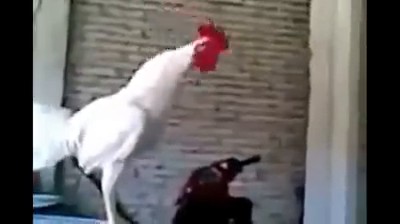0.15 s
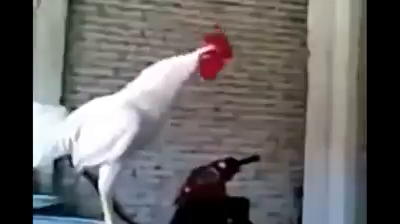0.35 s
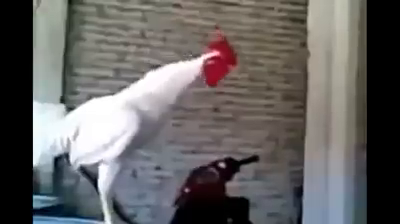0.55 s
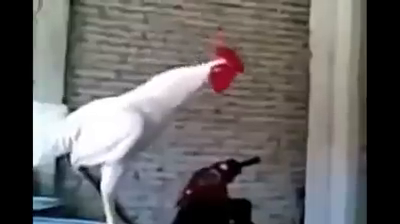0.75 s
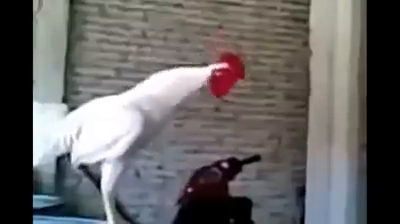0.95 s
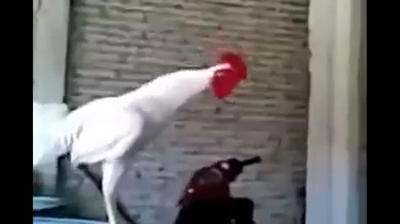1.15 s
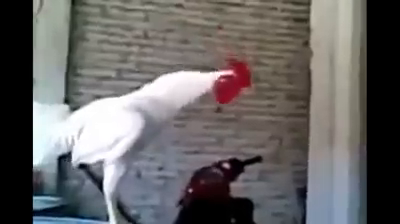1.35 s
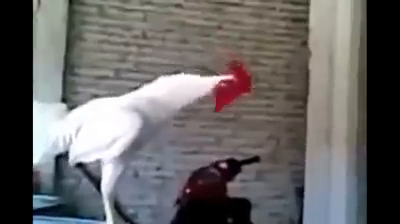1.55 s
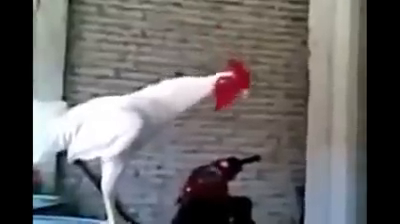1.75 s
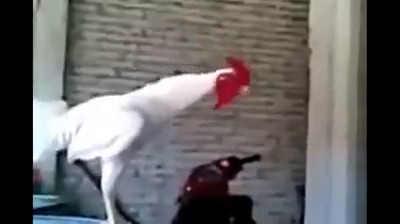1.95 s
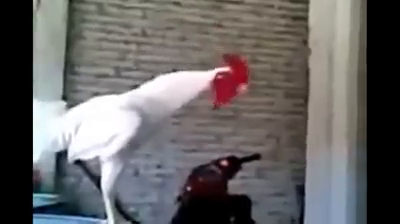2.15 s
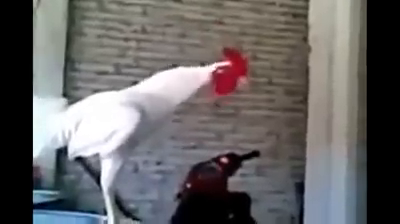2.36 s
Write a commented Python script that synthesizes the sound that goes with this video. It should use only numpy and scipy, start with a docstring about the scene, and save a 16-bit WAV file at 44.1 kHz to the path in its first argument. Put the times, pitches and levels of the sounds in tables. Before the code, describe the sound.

Rooster crowing without pause: a raspy held note, then a dozen pulsing yelps, distorted and close

```python
"""A steady outdoor wash and a low hum, wavering in pitch and level, lie behind a rooster crowing close to a wall.
It opens with one hoarse held note: harmonics, the second carrying the voice, mixed with resonant noise.
Then comes a chain of short syllables, most gliding up and sinking a little, the fundamental joining at a break.
After each, sparse decaying reflections of wall and yard ring on, with faint fuzzy tones fed by the voice.
Throughout, the small recorder overloads, which adds the treble, and leaves a brief afterglow."""
import sys
import numpy as np
from scipy import signal
from scipy.fft import rfft, irfft
from scipy.io import wavfile
from scipy.ndimage import uniform_filter1d

SR = 44100
rng = np.random.default_rng(int(sys.argv[2]) if len(sys.argv) > 2 else 0)


def dump_mix(stems):
    """Bounce the given channels to the path in sys.argv[1] as a 16-bit WAV at rate SR."""
    frames = np.atleast_2d(stems).T  # one column per channel
    limited = np.clip(frames, -1, 1)  # hard clip at full scale
    pcm = np.round(limited * 32767).astype(np.int16)
    wavfile.write(sys.argv[1], SR, pcm)


def ratio_of_db(decibels):
    """Turn decibels (scalar or array-like) into linear amplitude factors; 0 dB maps to 1."""
    return 10 ** (np.asarray(decibels, float) / 20)


N = 110250  # samples, 2.5 s


def evened(x):
    """Normalization: scales to rms 1."""
    return x / np.sqrt(np.mean(x ** 2) + 1e-20)


def wander(span):
    """Low-pass noise: white noise averaged twice over span samples, at rms 1."""
    return evened(uniform_filter1d(uniform_filter1d(rng.standard_normal(N), span), span))


def read(points, hz):
    """Interpolation of a spectrum or decay curve on a logarithmic frequency axis."""
    f, value = np.transpose(points)
    return np.interp(np.log(hz + 1), np.log(f + 1), value)


def resonate(x, hz, width):
    """Resonance by heterodyning: shift hz to zero, low-pass, shift back; gain 1 at the centre."""
    turn = np.exp(2j * np.pi * np.cumsum(hz * np.ones(len(x))) / SR)
    r = np.exp(-np.pi * width / SR)
    return 2 * (turn * signal.lfilter([1 - r], [1, -r], x / turn)).real


def resonate_twice(x, hz, width):
    """Cascaded resonance: two equal passes give steeper skirts."""
    return resonate(resonate(x, hz, width), hz, width)


def resonator_bank(x, bands):
    """Parallel resonances: the weighted sum of all bands."""
    return sum(ratio_of_db(db) * resonate_twice(x, hz, width) for hz, width, db in bands)


DROOP_HZ = 944  # corner of the recorder's coupling high-pass


def lifted(x):
    """Inverse filtering: undoes the coupling droop down to 20 Hz, so levels hold after the high-pass."""
    r = np.exp(-2 * np.pi * DROOP_HZ / SR)
    return signal.lfilter([1, -r], [1, -np.exp(-2 * np.pi * 20 / SR)], x)


# spectrum of the outdoor wash: f/Hz, relative density level/dB per Hz
WASH_SPECTRUM = [(30,6.5),(100,1.5),(400,-1),(800,8.5),(1500,1.5),(1900,-13.5),(2200,-53),(2600,-7.5),(3200,-20),(10000,-39.5)]
WASH_DB = -51.5  # rms, before lifting


def outdoor_wash():
    """Spectral shaping: steady Gaussian noise weighted by frequency."""
    spectrum = rfft(rng.standard_normal(N)) * ratio_of_db(read(WASH_SPECTRUM, np.fft.rfftfreq(N, 1 / SR)))
    return ratio_of_db(WASH_DB) * evened(irfft(spectrum, N))


# rms of the hum, before lifting, as it comes and goes: t/s, level/dB
HUM_LEVEL = [(0.0, -39), (0.05, -90), (0.311, -44.5), (0.37, -62.5), (0.649, -51), (0.88, -100),
             (0.99, -44), (1.02, -77), (1.2, -63), (1.26, -44.5), (1.3, -66), (1.36, -45.5), (1.531, -50.5),
             (1.61, -58.5), (2.38, -58.5), (2.42, -42), (2.5, -47.5)]
HUM_HZ, HUM_DRIFT_HZ = 148.4, 2.96  # mean frequency and its rms drift


def hum():
    """Frequency and amplitude modulation: a sine drifts in pitch under a level contour."""
    s, db = np.transpose(HUM_LEVEL)
    hz = HUM_HZ + HUM_DRIFT_HZ * wander(1500)
    level = ratio_of_db(np.interp(np.arange(N) / SR, s, db))
    return level * np.sqrt(2) * np.sin(2 * np.pi * np.cumsum(hz) / SR)


# reverberation time of wall and yard by band: f/Hz, t60/s
YARD_DECAY = [(500, 0.33), (800, 0.37), (1600, 0.2), (2600, 0.3), (6000, 0.27)]
ECHO_SPREAD_DB = 5  # mean of the exponential spread in dB: a few reflections stand out


def yard(x):
    """Reverberation: sparse echoes of random sign and size, each band decaying exponentially."""
    taps = np.zeros((1, SR // 2))
    at = np.arange(260, SR // 2 - 130, 130)
    at = at + rng.integers(0, 130, (1, len(at)))  # one echo in every 3 ms
    size = ratio_of_db(ECHO_SPREAD_DB * rng.exponential(1, at.shape))
    np.put_along_axis(taps, at, rng.choice([-1., 1.], at.shape) * size, 1)
    hz, t, bands = signal.stft(taps, SR, nperseg=256)
    decay = ratio_of_db(-60 * t / read(YARD_DECAY, hz)[:, None])
    tail = signal.istft(bands * decay, SR, nperseg=256)[1]
    return signal.fftconvolve(x[None], tail / np.linalg.norm(tail[0]), axes=1)[:, :N]


# faint fuzzy tones: f/Hz, width of one pass/Hz, level/dB relative to the voice's running rms, before lifting
FUZZY_TONES = [(570, 24, -34.5), (2551, 138, -35)]
LINGER_S, LAG_S = 0.14, 0.041  # t60 of the tones, delay after the voice


def lingering(bird):
    """Energy storage: narrow noise follows the delayed, exponentially smoothed power of the voice."""
    r = ratio_of_db(-120 / LINGER_S / SR)  # decay of power per sample
    noise = rng.standard_normal(N)
    tones = sum(ratio_of_db(db) * evened(resonate_twice(noise, f, w)) for f, w, db in FUZZY_TONES)
    fed = np.roll(bird, round(LAG_S * SR)) ** 2
    power = signal.lfilter([1 - r], [1, -r], fed, zi=[r * np.mean(bird ** 2)])[0]
    return tones * np.sqrt(power)


# colour of the hoarse air: f/Hz, width of one pass/Hz, relative level/dB
AIR_BANDS = [(736, 124, 3), (1181, 358, 12.5), (1484, 367, 13), (1682.5, 84, 8.5), (2533, 260, -0.5)]


def hoarse_air(turns):
    """Turbulence: noise pulsed at the pitch (phase turns) excites resonances; rms 1."""
    noise = rng.standard_normal(N) * (1 + .5 * np.cos(turns))
    return evened(resonator_bank(noise, AIR_BANDS))


SHIMMER_DB, SHIMMER_S = 17.5, 0.0041  # depth at full roughness, averaging span


def shimmer(rough):
    """Random amplitude modulation: brief dips as the voice breaks up, deeper where it is hoarse."""
    return ratio_of_db(SHIMMER_DB * rough * np.minimum(0, wander(round(SHIMMER_S * SR))))


JOIN_S = 0.0041  # rise of the fundamental up to the break
KNOCK_HZ, KNOCK_WIDTH_HZ = 323, 200
KNOCK_DB, KNOCK_S = -38.5, 0.013  # level beside the throat resonances, before VOICE_DB; delay


def knock(since):
    """Gated resonance: a short Gaussian burst of low narrow noise just after each voice break."""
    gate = np.exp(-((since - KNOCK_S) / (2 * JOIN_S)) ** 2)
    thud = gate * resonate(rng.standard_normal(N), KNOCK_HZ, KNOCK_WIDTH_HZ)
    return ratio_of_db(KNOCK_DB) * np.sqrt(SR / KNOCK_WIDTH_HZ) * thud


# one contour per short syllable: t/s, pitch f/Hz, second-harmonic level/dB
SYLLABLES = [
    [(.49,524.8,-9.5),(.505,537.8,-15),(.52,678.5,-9),(.55,707.4,-16),(.57,854.6,-3),(.585,803.4,-20),(.6,750,-1)],
    [(.655,546.2,-19),(.68,658.4,-15),(.7,718.5,-10),(.72,850.4,-13),(.755,848,-15),(.775,748,-21.5)],
    [(.825,524.3,-23.5),(.845,567,-17),(.865,647.4,-17),(.885,728.7,-18.5),(.9,831.4,-8),(.935,811.7,-16),(.955,749,-17)],
    [(1.005,539.7,-23),(1.035,620,-16.5),(1.05,683,-29),(1.062,806.5,-13.5),(1.1,833.7,-14),(1.115,800.2,-25.5),(1.14,740,-15.5)],
    [(1.192,545.3,-16),(1.225,603.2,-10.5),(1.24,685.3,-13),(1.255,803.6,-6.5),(1.275,803.4,-14),(1.29,741.5,-30)],
    [(1.36,541.4,-21.5),(1.372,552,-18.5),(1.395,577.3,-31),(1.412,797.8,-13.5),(1.44,793.3,-5.5),(1.455,759.4,-22.5),(1.49,735,-34)],
    [(1.53,526.8,-31),(1.56,565,-17),(1.575,608.2,-23),(1.585,685.2,-20.5),(1.592,789.7,-6),(1.62,767.9,-18),(1.655,739.6,-17)],
    [(1.71,530.7,-32),(1.74,552,-12),(1.757,700.5,-19.5),(1.775,771.7,-15.5),(1.8,765.2,-13),(1.815,726.4,-67.5)],
    [(1.885,542.7,-26.5),(1.92,543.2,-21.5),(1.93,650,-12),(1.958,692.2,-10),(1.982,670,-17.5),(2.0,656,-23.5)],
    [(2.07,513,-22),(2.09,521.8,-39),(2.103,541,-15.5),(2.115,640.5,-11),(2.15,622.3,-8),(2.165,590.5,-31),(2.175,578,-18)],
    [(2.255,515.2,-29.5),(2.292,532,-17),(2.305,646.4,-9),(2.33,618.5,-15),(2.355,628.5,-20.5),(2.38,617.6,-27.5),(2.39,610.5,-43)],
    [(2.452,508.3,-27),(2.48,510.3,-24),(2.492,537,-20),(2.5,570,-12)],
]
# the held opening note: t/s, pitch f/Hz, second-harmonic level/dB, fundamental level/dB
HELD_NOTE = [(0.0, 695.7, -3, -59), (0.042, 690.2, -21.5, -41), (0.054, 661.0, -15, -32),
             (0.134, 752.3, -6, -10), (0.144, 716.7, -4.5, -9), (0.168, 740.3, -6, -8),
             (0.208, 746.4, -9.5, -30.5), (0.226, 709.4, -12, 1.5), (0.29, 754.4, -8, -16.5),
             (0.302, 821.2, -15, -12.5), (0.352, 908.4, -10.5, -23), (0.365, 881.9, -10.5, -2.5),
             (0.43, 890, -14, -13.5), (0.47, 895.8, -32, -54)]
# voice quality: t/s, share of air (0-1), rms pitch jitter (ratio),
# fundamental level/dB of the syllables relative to the second harmonic
ROUGHNESS = [(0,1,0.03548,-15),(0.101,0.59,0.02835,-14),(0.279,0.69,0.0353,0),(0.448,0.84,0.0428,7.5),(.9,0.58,0.0451,5),(1.301,0.33,0.0236,3),(1.802,0.32,0.0289,2),(2.049,0.34,0.028,-0.5),(2.5,0.33,0.035,-1)]
# voice break of each syllable, the last one beyond the end: t/s
BREAKS = [0.506, 0.692, 0.866, 1.046, 1.226, 1.398, 1.577, 1.752, 1.957, 2.151, 2.34, 2.512]
# fixed resonances of throat and place: f/Hz, width of one pass/Hz, level/dB
THROAT_AND_PLACE = [(575,60,-10),(755,90,0),(840,100,-3),(1090,130,-4),(1260,120,-4),(1385,110,-3),(1600,130,-1),(1780,160,-4),(2550,130,-4),(1400,750,-4)]
EDGE_S = 0.029  # length of the soft start and end
THIRD_DB, THIRD_DB_PER_HZ = -12, -0.1471  # third harmonic re second at 526 Hz, weakening with pitch
LOW_TOP_HZ = 774.8  # the held note's low tone stays under this while the upper voice climbs
LOW_START_HZ, HOARSE_UNTIL_S = 735, 1.7  # until then the syllables' low tone is no lower than this
BEFORE_DB, FADE_DB_PER_S = -15.5, -120  # fundamental before the break, its fading after
VOICE_DB = 7  # drive into the recorder


def voice():
    """Source and filter: three jittered harmonics and hoarse air, gated by syllable, excite resonances."""
    t = np.arange(N) / SR
    at, rough, jitter, under_db = np.transpose(ROUGHNESS)
    points = list(HELD_NOTE)
    for part in SYLLABLES:
        points += [(s, hz, db, db + np.interp(s, at, under_db)) for s, hz, db in part]
    s, pitch, second_db, first_db = np.transpose(points)

    on = sum((t >= part[0][0]) * (t <= part[-1][0]) for part in [HELD_NOTE, *SYLLABLES])
    on = uniform_filter1d(1. * on, round(EDGE_S * SR), mode="nearest")
    rough = np.clip(np.interp(t, at, rough), 0, 1)

    hz, held = np.interp(t, s, pitch), t < HELD_NOTE[-1][0]
    low_floor = LOW_START_HZ * (t < HOARSE_UNTIL_S)
    low_hz = np.where(held, np.minimum(hz, LOW_TOP_HZ), np.maximum(hz, low_floor))
    shake = 1 + np.interp(t, at, jitter) * wander(120)
    turns, low_turns = 2 * np.pi * np.cumsum([hz * shake, low_hz * shake], axis=1) / SR

    # time since the break of the current syllable, negative before it
    starts = [part[0][0] for part in SYLLABLES]
    current = np.maximum(np.searchsorted(starts, t + EDGE_S) - 1, 0)
    since = t - np.take(BREAKS, current)
    join_db = BEFORE_DB * np.clip(-since / JOIN_S, 0, 1) + FADE_DB_PER_S * np.maximum(since, 0)

    first = ratio_of_db(np.interp(t, s, first_db) + join_db * ~held)
    second = ratio_of_db(np.interp(t, s, second_db))
    third = second * ratio_of_db(THIRD_DB + THIRD_DB_PER_HZ * (hz - 526))
    tone = first * np.cos(low_turns) + second * np.cos(2 * turns) + third * np.cos(3 * turns)

    clear = np.sqrt(2 * (1 - rough ** 2)) * tone
    hoarse = rough * second * hoarse_air(turns)
    source = on * shimmer(rough) * (clear + hoarse)
    return ratio_of_db(VOICE_DB) * (knock(since) + resonator_bank(source, THROAT_AND_PLACE))


WET_DB = -9  # yard re direct voice


def scene():
    """Superposition: bird, yard and background, alike in both channels."""
    bird = voice()
    wet = yard(bird)[0]
    background = lifted(outdoor_wash() + hum() + lingering(bird))
    mid = bird + ratio_of_db(WET_DB) * wet + background
    return np.array([mid, mid])


def low_pass(x):
    """Removes everything above the highest recorded frequency."""
    return signal.sosfilt(signal.butter(12, 11090, fs=SR, output="sos"), x)


# microphone peak: f/Hz, width/Hz, added level/dB
PRESENCE_PEAK = (4100, 1020, -11)
KNEE, SHARP, LOPSIDED = 0.33, 83, 0.086  # overload amplitude, hardness, earlier on the negative side
AFTER_DB, AFTER_S = -27, 0.14  # afterglow: level, t60
OUT_DB = 4.5  # output gain
DULL_HZ, EDGE_HZ = 4720, 10420  # microphone fall-off, band limit


def record(dry):
    """Nonlinear distortion, then linear filtering: overload, afterglow, high-pass, peak and band limit."""
    knee = KNEE * (1 + LOPSIDED * np.sign(dry))
    x = dry / (1 + abs(dry / knee) ** SHARP) ** (1 / SHARP)

    t = np.arange(SR // 4) / SR
    tail = rng.standard_normal((1, len(t))) * ratio_of_db(-60 * t / AFTER_S)
    x = x + ratio_of_db(AFTER_DB) * signal.fftconvolve(x, tail / np.linalg.norm(tail[0]), axes=1)[:, :N]

    x = ratio_of_db(OUT_DB) * signal.lfilter([1, -1], [1, -np.exp(-2 * np.pi * DROOP_HZ / SR)], x)
    hz, width, db = PRESENCE_PEAK
    x = x + ratio_of_db(db) * np.array([resonate(channel, hz, width) for channel in x])
    r = np.exp(-2 * np.pi * DULL_HZ / SR)
    x = signal.lfilter([1 - r], [1, -r], x)
    band_limit = signal.firwin(127, EDGE_HZ, window=("kaiser", 8), fs=SR)
    x = signal.oaconvolve(x, band_limit[None], "same")

    x = np.array([np.append(0, x[0, :-1]), x[1]])  # left channel one sample late
    mix = np.clip(x, -1, 1)
    return low_pass(mix)


dry = scene()
out = record(dry)
dump_mix(out)
```